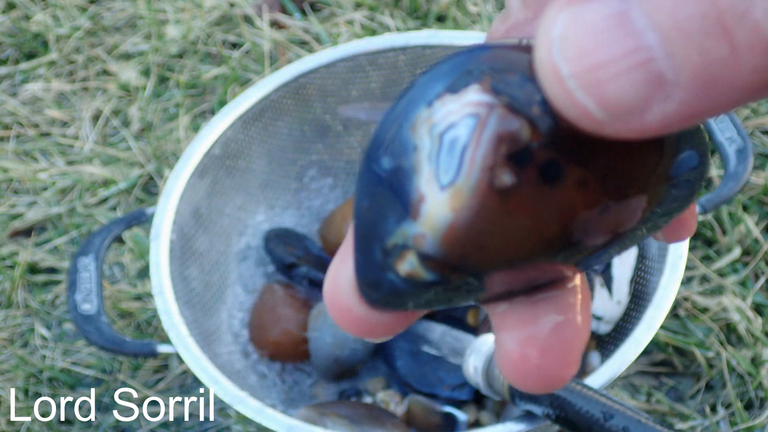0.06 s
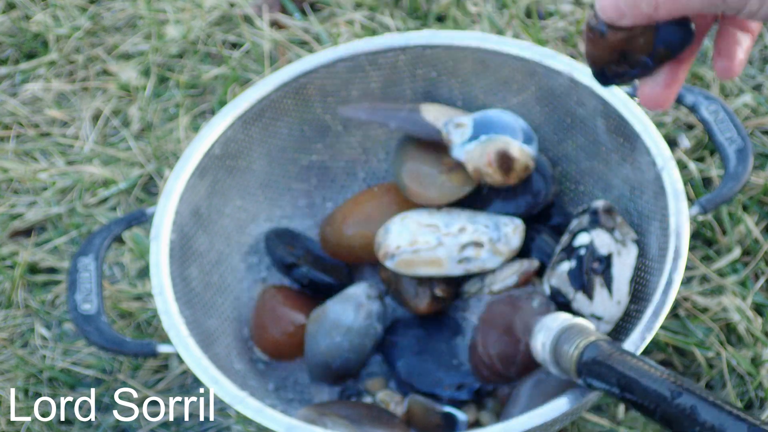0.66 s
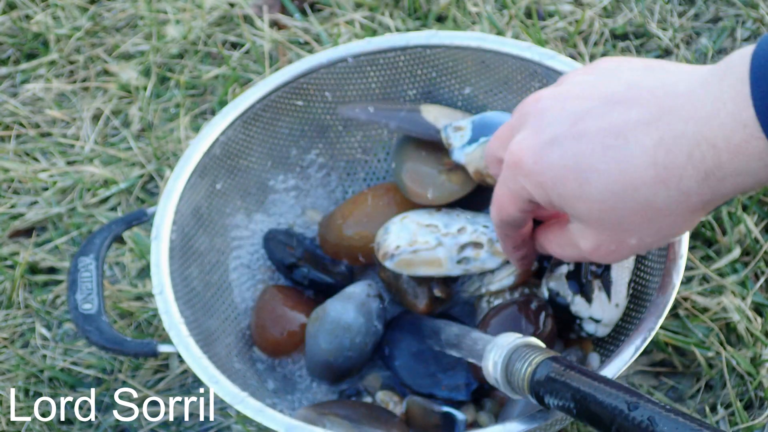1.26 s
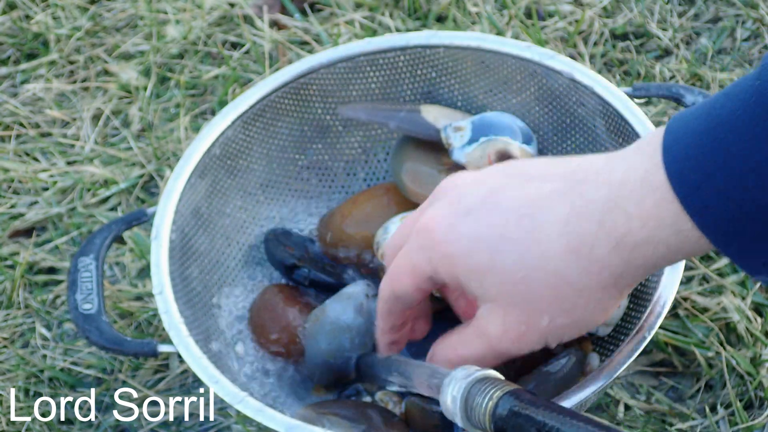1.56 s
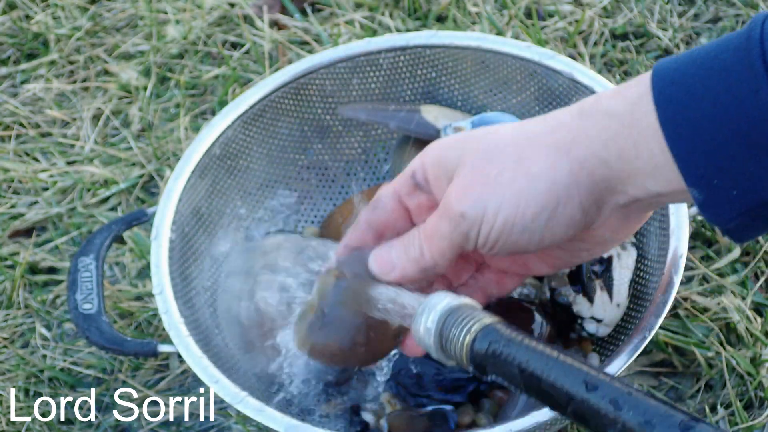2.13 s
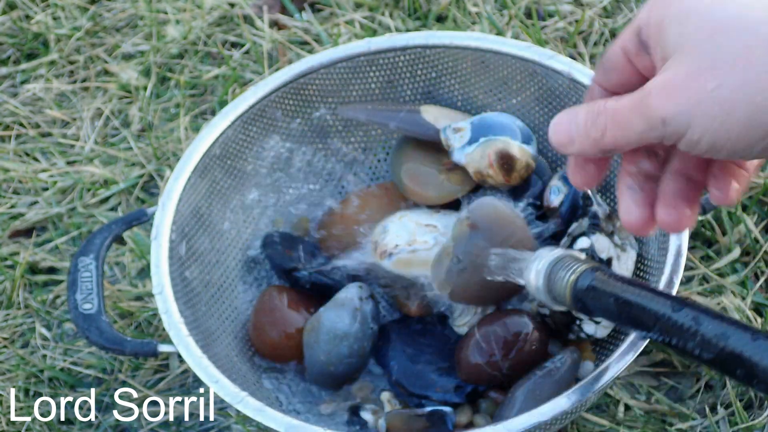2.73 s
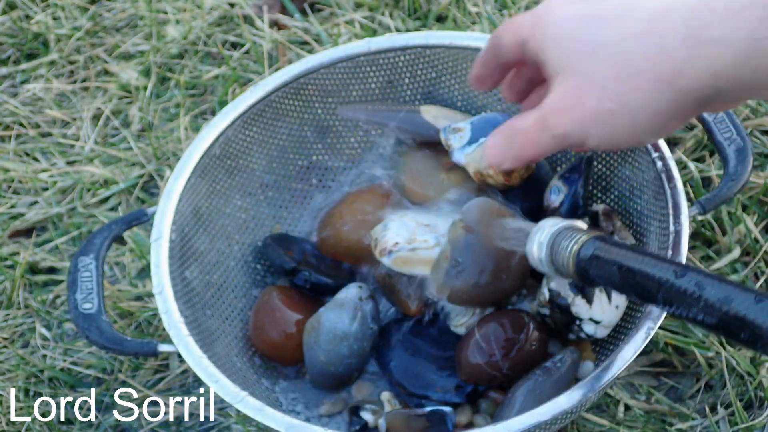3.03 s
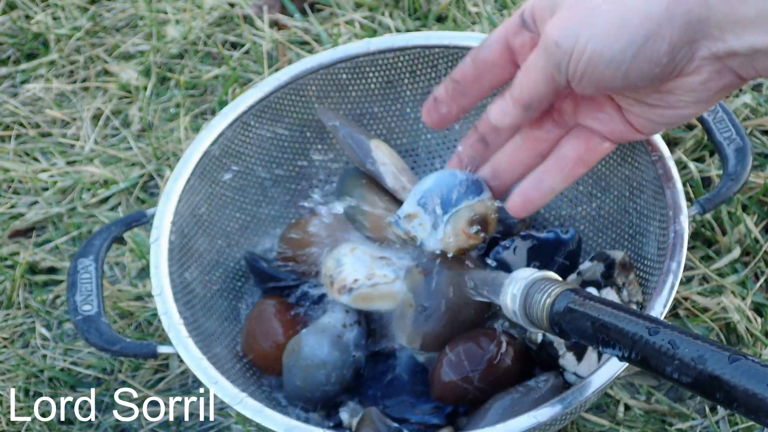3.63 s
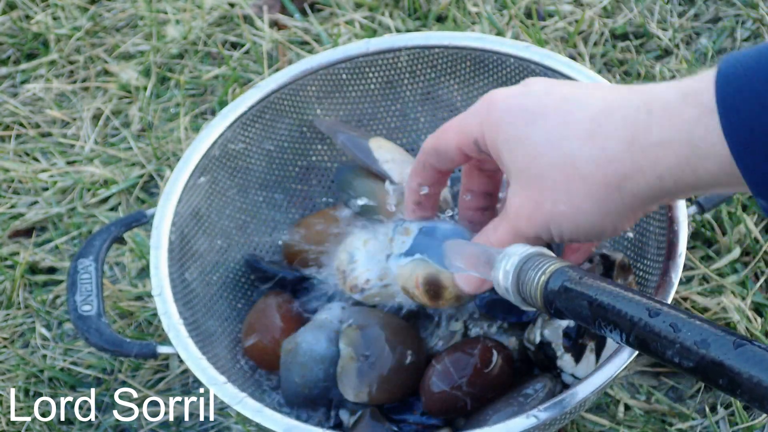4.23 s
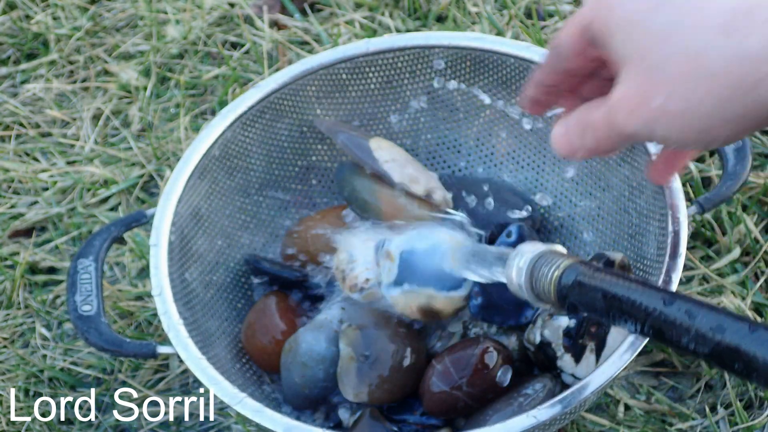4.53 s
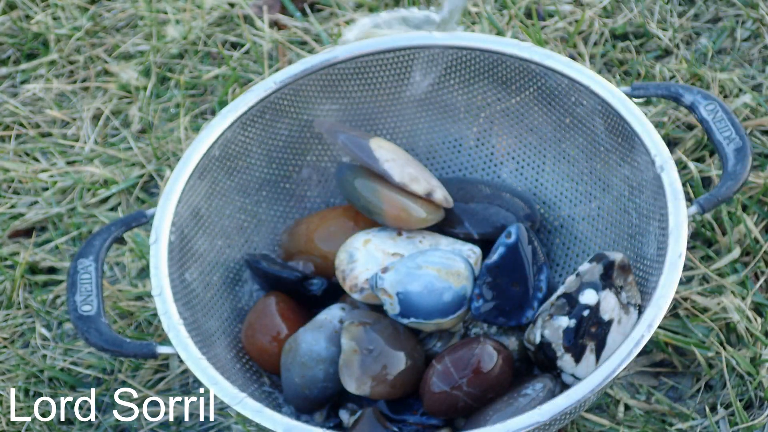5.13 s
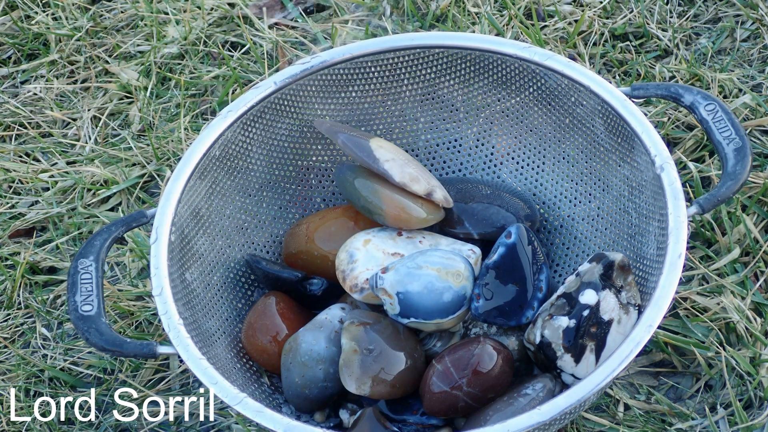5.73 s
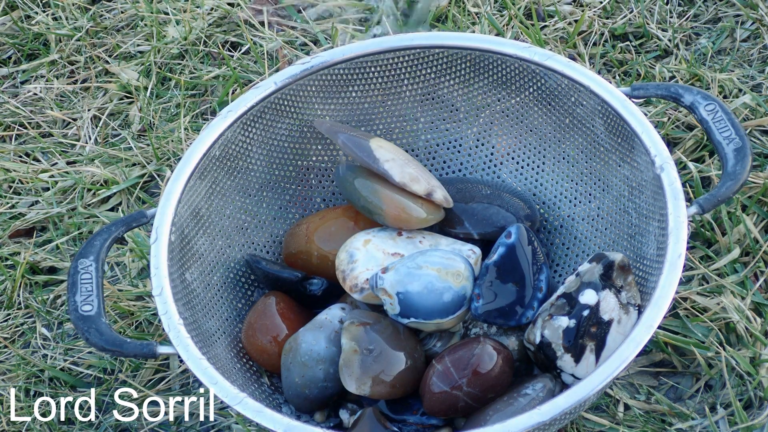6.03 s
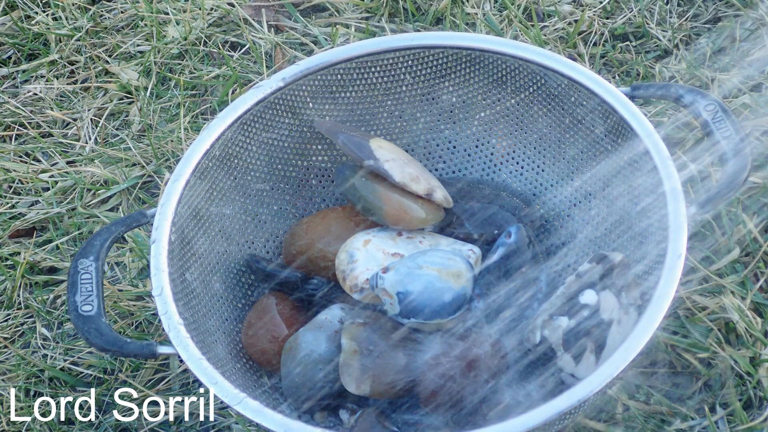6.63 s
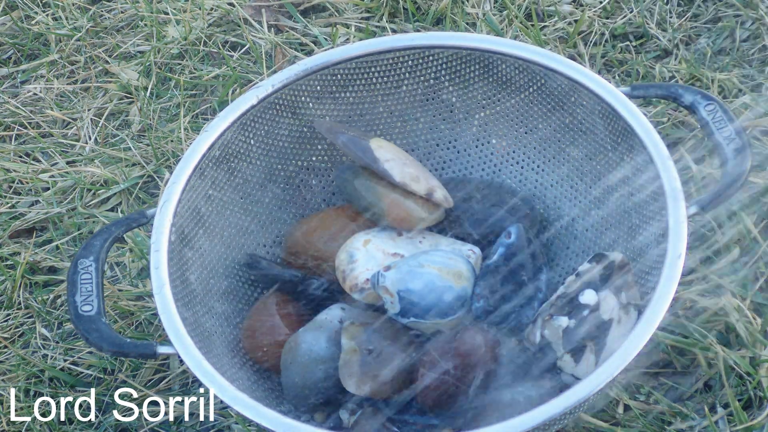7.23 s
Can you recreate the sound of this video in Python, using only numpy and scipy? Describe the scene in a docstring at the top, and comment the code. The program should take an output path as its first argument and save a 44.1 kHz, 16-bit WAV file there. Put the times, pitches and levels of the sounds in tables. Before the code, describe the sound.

Water from a garden hose patters and fizzes over pebbles in a steel colander, close to the microphone on a lawn. Wind buffets the microphone at first. Stones clack together as a hand turns them, and air gurgles in the gaps. The water briefly softens as the jet swings away, then returns as a louder, fine hissing spray. Faint traffic rumbles in the distance.

```python
"""Water from a garden hose patters and fizzes over pebbles in a steel colander, close by on a lawn.
Drops click on stone and mesh, and trapped air bubbles ring and gurgle in the gaps, while a hand
turns the stones and knocks them together. The jet swings away onto the grass, then returns as a
fine hard spray. Wind nudges the microphone at the start; traffic rumbles and a far motor hums."""
import sys
import numpy as np
from scipy import signal
from scipy.fft import rfft, irfft
from scipy.io import wavfile
from scipy.ndimage import uniform_filter1d

SR = 44100
rng = np.random.default_rng(int(sys.argv[2]) if len(sys.argv) > 2 else 0)


def persist_wave(psi):
    """Save psi, clipped to +-1, as 16-bit WAV."""
    counts = np.round(np.clip(psi, -1, 1) * 32767).astype(np.int16)
    wavfile.write(sys.argv[1], SR, np.atleast_2d(counts).T)


N = 329427
T = np.arange(N) / SR  # the time of each sample, in seconds

# Three tone colours. Each row: frequency in Hz, relative level in dB.
CLICK_TONE = [(1500, -36), (2800, -8), (3400, -15), (4300, -1.5), (6000, 4.5), (8700, -0.5), (10500, -16),
              (16000, -33)]  # a hard hit on stone or mesh
GURGLE_TONE = [(150, -32.5), (300, -8.5), (430, -26.5), (570, -1.5), (700, -8.5), (820, -3.5), (1000, -3),
               (1200, -1.5), (1650, -1), (2050, -5), (2480, -17.5), (3020, -9), (3550, -27)]  # water churning between the stones
SPRAY_TONE = [(2400, -16.5), (2950, -23), (3450, -23.5), (4400, -8), (5840, 0.5), (6500, 0), (7600, -3),
              (8640, 2.5), (9300, 0), (10400, -11), (14200, -11.5), (16000, -17)]  # the fine shower on the mesh


def undb(db):
    """Turn decibels into a number to multiply by: 0 dB gives 1, -6 dB about a half."""
    return 10 ** (np.asarray(db) / 20)


def unit(x):
    """Scale a signal so that its average (rms) level is 1."""
    return x / np.sqrt(np.mean(x ** 2))


def curve(table, column):
    """Join the values in one column of a table with straight lines through time."""
    rows = np.array(table)
    return np.interp(T, rows[:, 0], rows[:, column])


def pan(left_db):
    """Gains for the two channels that make the left one louder by left_db."""
    return undb(np.array([[left_db], [-left_db]]) / 2)


def wander(rate):
    """A random drift of size about 1 that heads for a new value `rate` times a second."""
    step = max(int(SR / rate), 2)
    stairs = np.repeat(rng.standard_normal(N // step + 1), step)
    return unit(uniform_filter1d(stairs, step)[:N])


def colour(x, tone, size=4096):
    """Filter a sound to a tone colour, given as rows of frequency in Hz and level in dB."""
    hz, db = np.transpose(tone)
    log_hz = np.log(np.maximum(np.fft.rfftfreq(size, 1 / SR), 1))
    beyond_ends = np.abs(log_hz - np.clip(log_hz, np.log(hz.min()), np.log(hz.max())))
    gain = undb(np.interp(log_hz, np.log(hz), db) - 20 * beyond_ends)
    # these steps make the filter ring only after a hit, never before it
    cepstrum = irfft(np.log(gain))
    cepstrum[1:size // 2] *= 2
    cepstrum[size // 2 + 1:] = 0
    response = irfft(np.exp(rfft(cepstrum)))
    return signal.oaconvolve(np.atleast_2d(x), response[None], axes=1)[:, :x.shape[-1]]


def add(out, start, sound):
    """Mix a short sound into `out`, beginning at `start` seconds."""
    i = max(int(start * SR), 0)
    out[:, i:i + sound.shape[-1]] += sound[..., :N - i]


def fade(t, seconds):
    """A smooth decay that falls by 60 dB in the given time."""
    return np.exp(-np.log(1000) * t / seconds)


def set_onset(sound, db, seconds):
    """Scale a hit so that its first moments have the given average level."""
    return sound * undb(db) / np.sqrt(np.mean(sound[:, :int(seconds * SR)] ** 2))


def surges(rows, attack_s, release_s):
    """The combined strength of surges of water: each one rises, holds and drains away."""
    power, t = np.zeros((1, N)), T[:SR]
    for start, length, db in rows:
        rise = np.minimum(t / attack_s, 1)
        drain = np.exp(-np.maximum(t - length, 0) / release_s)
        add(power, start, (undb(db) * rise * drain) ** 2)
    return np.sqrt(power[0])


def bubble(t, hz, cycles, glide):
    """A bubble pinches off, then rings for about `cycles` waves, rising in pitch as it dies."""
    age = np.clip(t * hz / cycles, 0, 2)
    pinch_off = 1 - np.exp(-age * cycles)
    phase = 2 * np.pi * cycles * age * (1 + glide * age / 2)
    return pinch_off * fade(age, 1) * np.sin(phase)


def swarm(per_s, lo_hz, hi_hz, cycles, spread_db, scatter, size):
    """Many bubbles of random pitch, life and strength, scattered between left and right."""
    count = int(per_s * N / SR)
    when, pitch = rng.random((count, 2)).T
    strength, life, place = np.clip(rng.standard_normal((count, 3)), -2.5, 2.5).T
    hz = lo_hz + (hi_hz - lo_hz) * pitch
    rings = bubble(np.arange(size) / SR, hz[:, None], cycles * np.exp(0.55 * life[:, None]), glide=0.057)
    rings *= (undb(spread_db * strength) * np.sqrt(hz))[:, None]
    samples = (when * N).astype(int)[:, None] + np.arange(size)
    sides = [rings * (1 + side * scatter * place[:, None]) for side in (1, -1)]
    # bincount adds every ring in at its own samples
    return unit(np.array([np.bincount(samples.ravel(), side.ravel(), N)[:N] for side in sides]))


def impacts(per_s, spread_db, width):
    """Drops strike stone and mesh at random times: sharp clicks of very unequal size."""
    strength = np.clip(rng.standard_normal((2, N)), -2.5, 2.5)
    lands = rng.random((2, N)) < per_s / SR
    middle, side = lands * undb(spread_db * strength) * rng.choice([-1, 1], (2, N))
    side = signal.lfilter([1, -.8], 1, side)  # high sounds differ most between left and right
    return unit(middle + width * side * np.array([[1], [-1]]))


def ring_hollows(x):
    """The hollows of the stone pile and the bowl ring along with a sound."""
    # One hollow per row. Each row: pitch in Hz, width of its peak in Hz, relative level in dB.
    hollows = [(625, 49, -5), (776, 60, -3), (1228, 81, 0)]
    return x + sum(undb(db) * signal.lfilter(*signal.iirpeak(hz, hz / width, fs=SR), x)
                   for hz, width, db in hollows)


def traffic_and_motor():
    """Distant traffic rumbles, and the wavering hum of a far motor swells once and sinks back."""
    # The tone colour of the traffic. Each row: frequency in Hz, relative level in dB.
    traffic_tone = [(20, -22), (50, -7), (110, 2), (220, 2.5), (340, 0.5), (410, -5.5), (490, -1.5),
                    (680, -10), (1200, -2.5), (3000, -44)]
    # The notes in the motor's hum. Each row: pitch in Hz, relative level in dB.
    motor_notes = [(93.7, -53), (187, -70), (360.5, -57.5)]
    peak_s, swell_s, far_db, near_db = 5.6, 0.63, -3.5, 1.5
    rumble = unit(colour(rng.standard_normal(N) + 0.23 * rng.standard_normal((2, N)), traffic_tone))
    motor_time = np.cumsum(1 + .012 * wander(9)) / SR  # the speed drifts by about 1 percent
    hum = sum(undb(db + 1.4 * wander(5.1)) * unit(np.sin(2 * np.pi * hz * motor_time))
              for hz, db in motor_notes)
    swell_db = far_db + (near_db - far_db) * np.exp(-((T - peak_s) / swell_s) ** 2)
    return (undb(-43.5) * rumble + hum * undb(swell_db)) * pan(2.5)


def wind(size=4096):
    """Air swirls at the microphone: low gusts over a dying breeze, and two thumps on the left."""
    # Gusts of wind. Each row: time of the peak in seconds, length in seconds, relative level in dB.
    gusts = [(0.037, 0.073, -41), (0.173, 0.086, -34), (0.263, 0.11, -30.5), (0.402, 0.11, -24.5),
             (0.478, 0.11, -23.5), (0.625, 0.094, -24.5), (0.725, 0.091, -25.5), (0.865, 0.08, -28.5),
             (0.943, 0.08, -26), (1.062, 0.066, -35), (1.203, 0.12, -28)]
    # Sudden thumps of air. Each row: start in seconds, relative level in dB.
    thumps = [(0.468, -18.5), (0.936, -18.5)]
    # Two tone colours. Each row: frequency in Hz, relative level in dB.
    swirl_tone = [(25, -28), (55, -4.5), (100, 6.5), (150, 0), (260, -12.5), (500, -43)]
    thump_tone = [(30, -22), (110, 3), (250, 0.0), (420, -10.0), (800, -45)]
    breeze_db, breeze_drops_s, breeze_ends_s = -37.5, 0.53, 2.15
    swirls = unit(colour(rng.standard_normal((2, N)), swirl_tone))
    force = undb(breeze_db) * np.interp(T, [breeze_drops_s, breeze_ends_s], [1, 0])[None]
    for peak_s, length, db in gusts:
        add(force, peak_s - length / 2, undb(db) * np.hanning(int(length * SR)))
    out = swirls * force
    thump = colour(signal.unit_impulse(size), thump_tone)
    for start, db in thumps:
        add(out, start, thump / np.abs(thump).max() * undb(db) * pan(15))
    return out


def stone_clacks(size=3072):
    """Stone hits stone: a crack with a brief ring, a rattle on the mesh and a knock from the pile."""
    # Hits between stones. Each row: start in seconds, relative crack level in dB, main ring in Hz,
    # relative rattle level in dB, relative knock level in dB.
    hits = [(1.052, -20, 5230, -33, -25), (1.079, -15.5, 5100, -33, -27.5), (1.289, -11, 5340, -18, -16.5),
            (1.32, -7, 5700, -17, -29), (1.376, -16.5, 5270, -37, -29), (1.403, -27, 5940, -27, -24.5),
            (1.444, -15, 6030, -16.5, -14.5), (2.3111, -22.5, 7500, -18.5, -10.5),
            (2.353, -19, 4890, -17.5, -14.5), (2.514, -7, 6460, -29, -22), (2.539, -9, 5850, -24, -16),
            (2.687, -2.5, 8340, -23, -16.5), (2.695, -13, 5430, -13.5, -19.5),
            (2.724, -17.5, 5600, -36, -18), (2.83, -12, 5500, -20, -12.5), (3.843, -16, 6200, -26, -25),
            (3.881, -34, 6300, -23, -19.5), (3.976, -13, 5500, -17, -11), (4.001, -11.5, 5640, -18, -14),
            (4.03, -16, 8100, -14.5, -29), (4.092, -14, 5540, -13, -13.5), (4.224, -19, 5100, -23, -19.5),
            (4.282, -14.5, 6230, -35, -28), (4.671, -16, 8000, -28, -18)]
    # The tone colour of the knocked pile. Each row: frequency in Hz, relative level in dB.
    knock_tone = [(100, -33), (350, -13), (580, -1.5), (700, -5.5), (820, 4), (1000, -3), (1350, 6),
                  (1900, 5), (2500, -4.5), (2950, -7.5), (3400, -7), (6000, -28)]
    out, t = np.zeros((2, N)), np.arange(size) / SR
    contact = signal.unit_impulse(size)
    for start, crack_db, hz, rattle_db, knock_db in hits:
        grit, mesh, pile, side = rng.standard_normal((4, size))
        side = 0.34 * side * np.array([[1], [-1]])
        other_hz = hz * np.exp(0.29 * rng.standard_normal((3, 1)))  # three weaker notes of the stone
        ring = np.sin(2 * np.pi * hz * t) + .5 * np.sin(2 * np.pi * other_hz * t).sum(axis=0)
        crack = colour(undb(14.5) * contact + (grit + side + .7 * ring) * fade(t, .005), CLICK_TONE)
        rattle = colour((mesh + side + undb(-14.5) * ring) * fade(t, 0.04), CLICK_TONE)
        knock = colour(contact + undb(-21) * pile * fade(t, 0.031), knock_tone)
        add(out, start, set_onset(crack, crack_db + 3, seconds=.0015) * pan(.8))
        add(out, start, set_onset(rattle, rattle_db - 1, seconds=0.0079) * pan(.8))
        add(out, start, set_onset(knock, knock_db + .5, seconds=0.0024) * pan(3.6))
    return out


def smacks(size=512):
    """Fast shower drops tick on the mesh and shatter, each a little to the left or right."""
    # The fast drops. Each row: start in seconds, relative level in dB.
    fast_drops = [(6.0646, -10), (6.312, -2), (6.4803, 3), (6.505, 2), (6.8222, 1), (7.0619, 2), (7.067, 6)]
    out, t = np.zeros((2, N)), np.arange(size) / SR
    for start, db in fast_drops:
        shatter = undb(-28) * rng.standard_normal((2, size)) * fade(t, 0.0033)
        tick = colour(signal.unit_impulse(size) + shatter, SPRAY_TONE)
        left_db = 1 + 3 * rng.standard_normal()
        add(out, start, tick / np.abs(tick).max() * undb(db + 2) * pan(left_db))
    return out


def plinks(size=512):
    """A drop slaps down and traps a tiny bubble that rings for a few milliseconds."""
    # Single loud drops. Each row: start in seconds, relative level in dB, starting pitch in Hz.
    loud_drops = [(0.712, -15, 6300), (0.7587, -2, 6760), (2.0164, -1.5, 6600), (2.0683, -8, 6180),
                  (2.952, -8, 5340), (3.3863, -6, 8200), (3.701, -6.5, 6750), (3.933, -5, 8140),
                  (3.9928, -7, 5640), (4.3403, -9, 6400), (4.548, 2, 6600), (5.047, -11.5, 6000),
                  (5.101, -16, 4870), (5.1377, -13, 5400), (5.186, -13, 9500), (5.234, -15, 6350)]
    out, t = np.zeros((2, N)), np.arange(size) / SR
    for start, db, hz in loud_drops:
        slap = unit(colour(rng.standard_normal(size) * fade(t, 0.014), CLICK_TONE))
        ring = bubble(t, hz, cycles=38, glide=.03)
        add(out, start, (ring + undb(-26) * slap) * undb(db + 2))
    return out * pan(.6)


def gulps(size=2048):
    """Air is driven between the stones: one big bubble rings and the gap around it splutters."""
    # The loudest gulps. Each row: start in seconds, relative level in dB, starting pitch in Hz.
    big_bubbles = [(2.848, -21, 1040), (2.864, -10.5, 1740), (2.883, -16.5, 846), (2.893, -11.5, 1260),
                   (3.296, -6.5, 1600), (3.392, -9, 1640), (3.455, -9, 1250), (3.501, -6.5, 1160),
                   (3.667, -8, 1400), (3.976, -11, 1280), (4.005, -3, 1470), (4.027, -3, 1185),
                   (4.032, -6, 790), (4.094, -6, 1240), (4.198, -11.5, 1200), (4.218, -7, 1660),
                   (4.235, -13, 1230), (4.266, -12, 1370), (4.283, -10, 1230), (4.476, -10.5, 1600),
                   (4.674, -10, 1420)]
    out, t = np.zeros((2, N)), np.arange(size) / SR
    for start, db, hz in big_bubbles:
        splutter = ring_hollows(colour(rng.standard_normal(size) * fade(t, 0.017), GURGLE_TONE))
        gulp = unit(bubble(t, hz, cycles=26, glide=.03)) + undb(-5) * unit(splutter)
        add(out, start, gulp / np.abs(gulp).max() * undb(db + 1) * pan(3.4))
    return out


def slosh(shower_share, strength):
    """The water's low part: the jet sloshes on stones and churns air into gaps; the shower drums."""
    # Two tone colours. Each row: frequency in Hz, relative level in dB.
    slosh_tone = [(260, -58.5), (450, -13), (593, -1.5), (688, -14.5), (827, -3.5), (1190, 0.5),
                  (1480, 0.5), (1890, -3.5), (2050, -2.5), (2460, -16), (2840, -11), (3300, -12.5),
                  (4290, -64), (7260, -120)]  # the jet running over the stones
    drum_tone = [(200, -21), (400, -7.5), (560, -9.5), (690, -12.5), (850, -2), (1200, 1), (1500, 0),
                 (2000, -5), (2500, -20.5), (2900, -9), (3400, -28), (4300, -51)]  # the shower on wet stone and grass
    # The jet bores into a gap. Each row: start in seconds, length in seconds, relative level in dB.
    churns = [(2.85, 0.04, -35), (2.97, 0.045, -32.5), (3.185, 0.026, -21), (3.265, 0.17, -26.5),
              (3.44, 0.03, -20), (3.498, 0.038, -19), (3.56, 0.093, -28.5), (3.652, 0.031, -21),
              (3.72, 0.037, -33), (3.87, 0.028, -27), (3.96, 0.07, -26), (4.065, 0.07, -26),
              (4.195, 0.125, -26), (4.42, 0.13, -29.5), (4.68, 0.09, -32)]
    bubbles = swarm(per_s=800, lo_hz=700, hi_hz=2800, cycles=18, spread_db=3.5, scatter=.04, size=400)
    top_drops = impacts(per_s=6000, spread_db=3, width=0.15)
    jet = unit(colour(top_drops + undb(-11) * bubbles, slosh_tone))
    drumming = unit(colour(impacts(per_s=9000, spread_db=3.5, width=0.17), drum_tone))
    surface = np.sqrt(1 - shower_share) * jet + np.sqrt(shower_share) * drumming
    gap_drops = impacts(per_s=4000, spread_db=4.5, width=0.23)
    gurgle = unit(ring_hollows(colour(gap_drops + undb(-5) * bubbles, GURGLE_TONE)))
    soft_gulps = swarm(per_s=90, lo_hz=1032, hi_hz=1500, cycles=33, spread_db=-1, scatter=.04, size=2048)
    in_gaps = (gurgle + undb(-7.5) * soft_gulps) * surges(churns, attack_s=0.011, release_s=0.016)
    return (surface * strength * undb(0.45) + in_gaps) * pan(3.46)


def patter(shower_share, strength, slap_strength):
    """The water's bright part: the jet patters, fizzes, drips and slaps; the shower ticks in bunches."""
    # Two tone colours. Each row: frequency in Hz, relative level in dB.
    patter_tone = [(1410, -44), (2400, -17), (2790, -34), (3350, -16), (4250, -8), (5840, 0.5), (6630, -1),
                   (7590, -5), (8820, -1), (9480, -6), (10400, -15), (14000, -16.5), (15300, -34),
                   (16000, -9)]  # the jet's drops on stone and mesh
    slap_tone = [(1500, -11.5), (2000, -3), (2450, -8.5), (2900, -5), (3400, -17.5), (4200, -2), (5300, 0),
                 (7000, -10)]  # the slap of the solid jet
    drops = impacts(per_s=12000, spread_db=5, width=.33) * undb(1.5 * wander(600))
    fizz = swarm(per_s=2800, lo_hz=3800, hi_hz=10500, cycles=22, spread_db=6, scatter=.22, size=160)
    drips = swarm(per_s=90, lo_hz=4470, hi_hz=9670, cycles=36, spread_db=5.5, scatter=0.17, size=512)
    jet = unit(colour(unit(drops) + undb(-7) * fizz + undb(-12) * drips, patter_tone))
    slap = unit(colour(impacts(per_s=3500, spread_db=5, width=.3), slap_tone))
    fine_drops = impacts(per_s=18000, spread_db=3, width=.4) * undb(1.6 * wander(220))
    coarse_drops = impacts(per_s=600, spread_db=5, width=.4)
    spray = unit(colour(unit(fine_drops) + undb(-7) * coarse_drops, SPRAY_TONE))
    surface = np.sqrt(1 - shower_share) * jet + np.sqrt(shower_share) * spray
    in_bowl = np.interp(T, [4.1, 5.0], [1, 0])  # the jet slaps only at short range
    return (surface * strength * undb(1.54) + slap * slap_strength * in_bowl * undb(-2.5)) * pan(0.68)


def hose_water():
    """The wobbling jet lands in clumps that patter and slosh together; the shower falls more evenly."""
    # The steady run of water. Each row: time in seconds, then relative patter and slosh levels in dB.
    flow = [(0, -31, -37), (0.47, -29.5, -36.5), (0.85, -25.5, -32), (1.58, -32, -39), (2.08, -26, -35),
            (2.28, -35, -37.5), (2.44, -35, -36.5), (2.95, -30, -37.5), (3.8, -31.5, -34),
            (4.18, -33.5, -34.5), (4.6, -29, -38.5), (4.97, -36, -39), (5.35, -39, -43),
            (5.9, -34.5, -47.5), (6.25, -31, -42), (6.45, -22, -38), (7.25, -19, -34), (7.47, -22.5, -37)]
    # The water sweeps across a stone, the hand or the mesh.
    # Each row: start in seconds, length in seconds, then relative patter and slosh levels in dB.
    sweeps = [(0.688, 0.029, -24, -32.5), (0.829, 0.052, -23, -42), (1.259, 0.087, -45, -31),
              (1.511, 0.024, -39, -33), (1.708, 0.18, -26, -38), (1.958, 0.066, -28, -36.5),
              (2.463, 0.095, -23.5, -33.5), (2.568, 0.12, -26.5, -34), (2.773, 0.049, -22, -34),
              (3.178, 0.27, -25, -26), (3.315, 0.076, -16.5, -20.5), (3.934, 0.075, -28, -32),
              (4.332, 0.18, -27.5, -49), (4.648, 0.025, -26.5, -64), (4.784, 0.11, -26, -34.5),
              (5.09, 0.1, -31, -37), (6.022, 0.055, -28, -34.5), (6.273, 0.046, -19.5, -27.5),
              (6.334, 0.063, -22.5, -30.5), (6.453, 0.049, -18.5, -27.5), (6.59, 0.063, -19.5, -39.5),
              (6.784, 0.034, -20, -36), (6.935, 0.059, -20, -33), (7.04, 0.05, -19.5, -31)]
    attack_s, release_s = 0.017, 0.03
    twist_start_s, twist_end_s = 5.15, 6.58  # the nozzle is twisted from solid jet to fine shower
    shower_share = np.interp(T, [twist_start_s, twist_end_s], [0, 1])
    patter_sweeps = surges([(start, length, db) for start, length, db, _ in sweeps], attack_s, release_s)
    slosh_sweeps = surges([(start, length, db) for start, length, _, db in sweeps], attack_s, release_s)
    patter_strength = np.hypot(undb(curve(flow, column=1)), patter_sweeps)  # hypot adds their powers
    slosh_strength = np.hypot(undb(curve(flow, column=2)), slosh_sweeps)
    wobble_db = .6 * wander(28) + .9 * wander(60) + 1.45 * wander(400)
    clumps = unit(undb(wobble_db * (1.52 - 0.41 * shower_share)))
    bright = patter(shower_share, patter_strength, slap_strength=slosh_strength)
    low = slosh(shower_share, slosh_strength)
    return clumps * (bright + low)


def scene():
    """All the sounds together in the open air, with no room echo."""
    return hose_water() + gulps() + plinks() + smacks() + stone_clacks() + wind() + traffic_and_motor()


def record(dry):
    """The recorder rounds off the loudest peaks and cuts the highest treble."""
    ceiling, top_hz = .95, 15800
    rounded = dry / (1 + (dry / ceiling) ** 4) ** .25
    return signal.sosfilt(signal.ellip(10, .2, 70, top_hz, fs=SR, output="sos"), rounded)


dry = scene()
out = record(dry)
persist_wave(out)
```